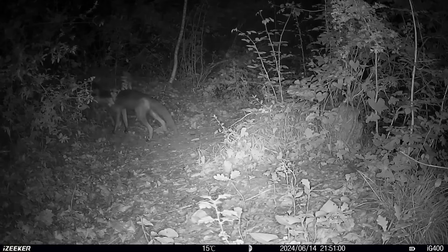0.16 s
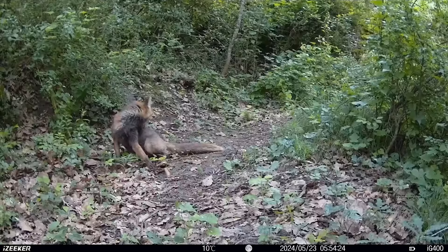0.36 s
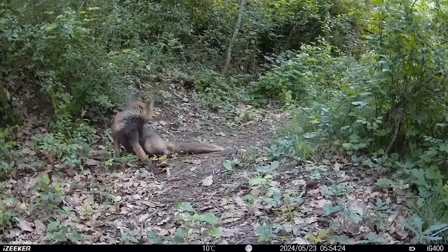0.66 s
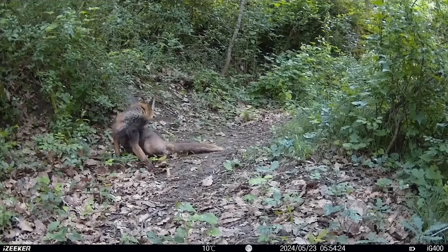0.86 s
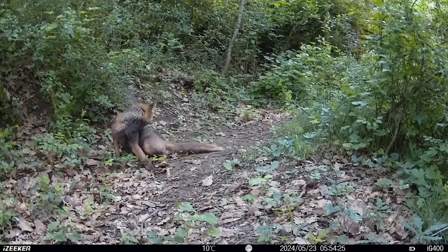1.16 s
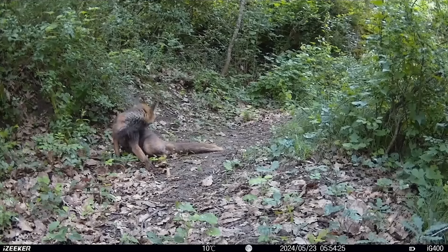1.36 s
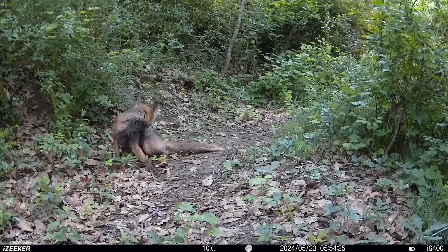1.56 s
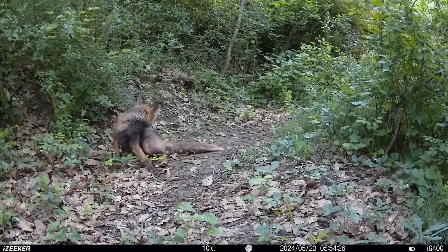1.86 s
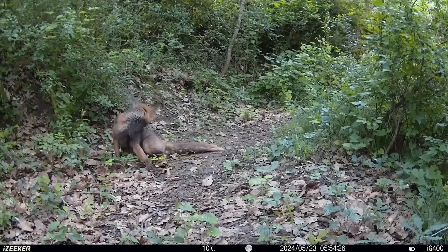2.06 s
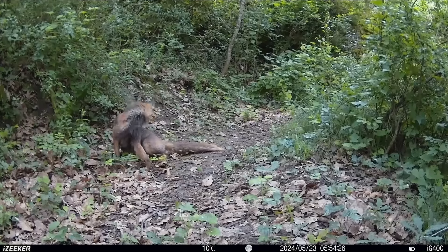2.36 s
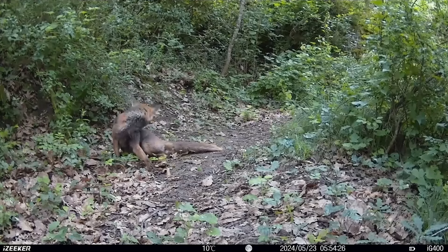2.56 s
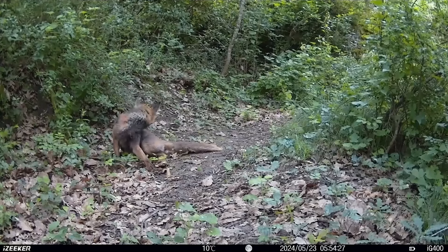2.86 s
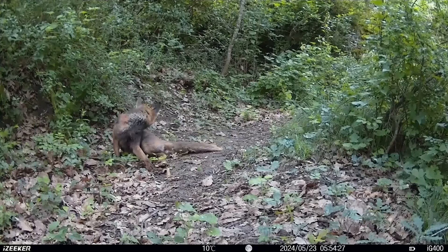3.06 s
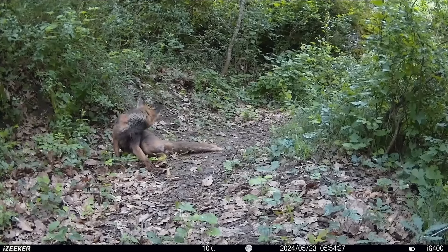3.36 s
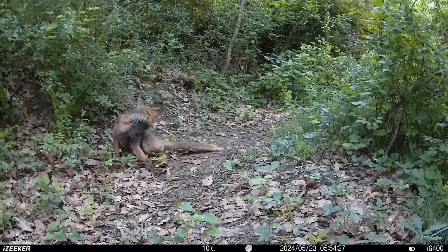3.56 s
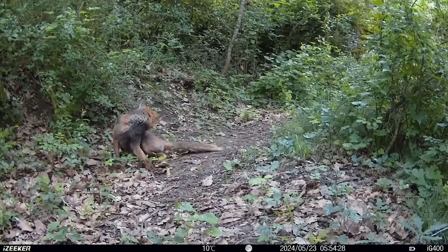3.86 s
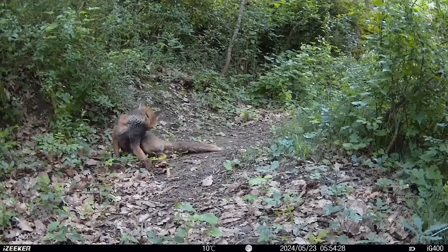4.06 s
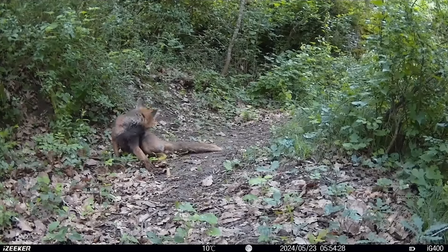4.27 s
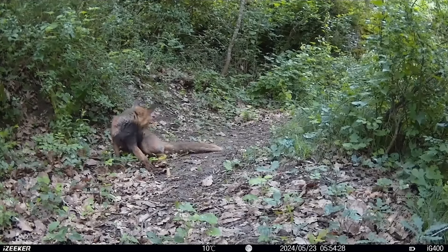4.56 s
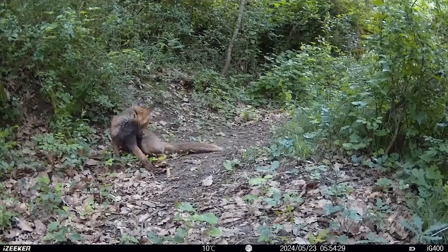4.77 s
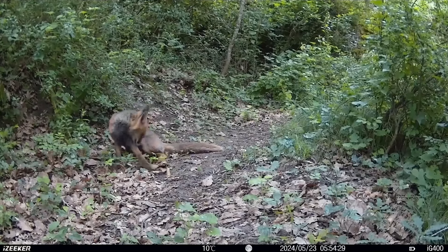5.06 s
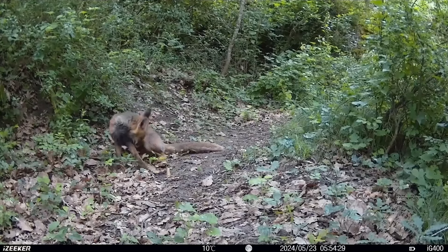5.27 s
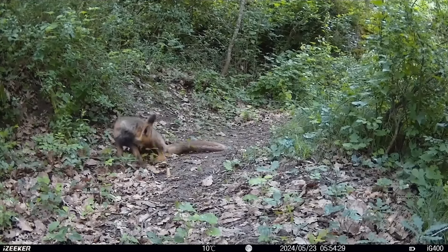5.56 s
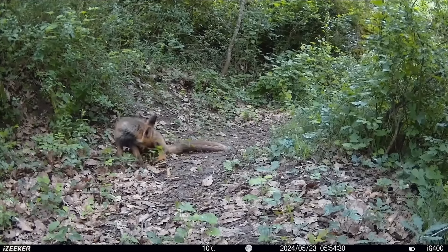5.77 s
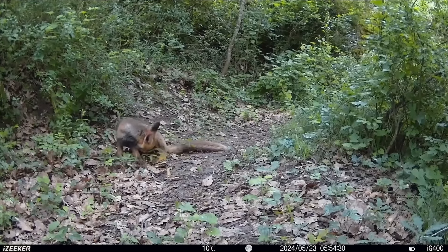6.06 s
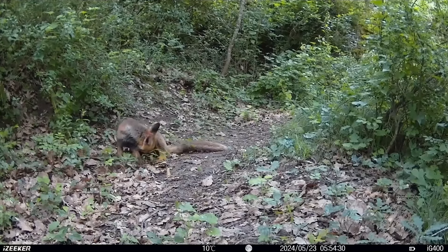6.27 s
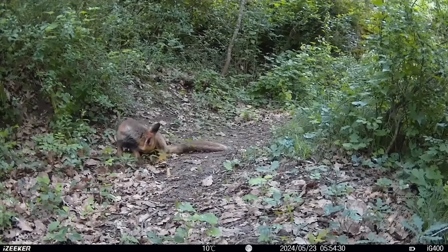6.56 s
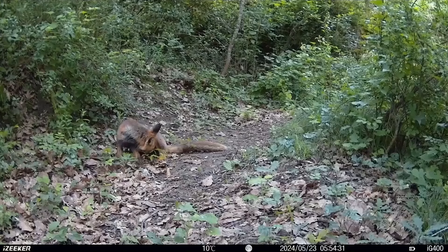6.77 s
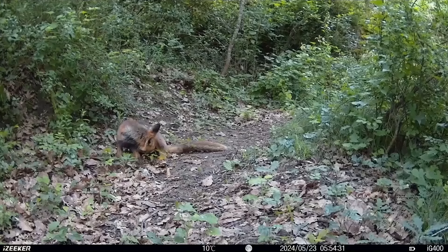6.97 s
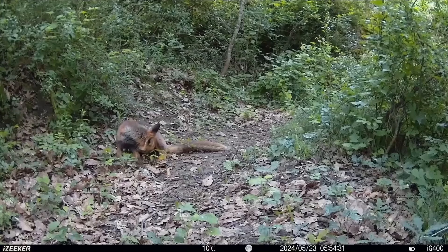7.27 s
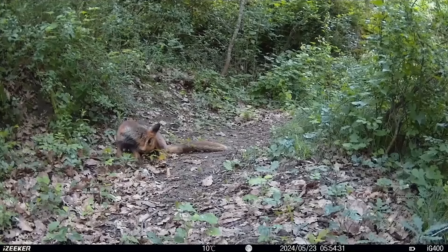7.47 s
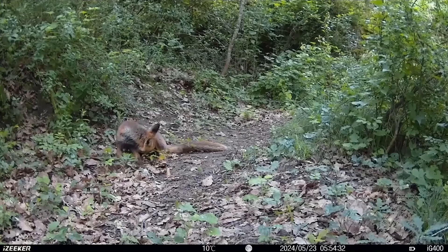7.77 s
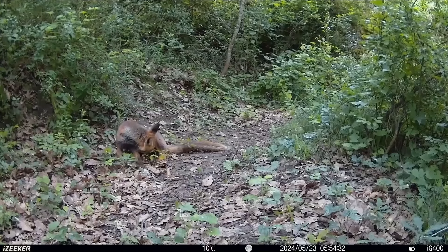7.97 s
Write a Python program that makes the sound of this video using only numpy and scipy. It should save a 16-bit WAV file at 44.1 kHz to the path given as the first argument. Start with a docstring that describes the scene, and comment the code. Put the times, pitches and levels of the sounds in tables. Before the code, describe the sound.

A scrap of quiet night air with a tiny dry leaf crackle cuts to silence, then a very loud distorted pop as the microphone switches on. A woodland dawn chorus follows: short gliding whistles, high chirps and bright quick ticks from a nearer bird, echoing off trunks. A soft distant road rumble and thin microphone hiss continue throughout. The fox grooming itself is not heard.

```python
"""Dawn chorus in a wood, taken by a small outdoor camera over filtered-noise road rumble and microphone hiss.
A scrap of night air with one leaf rustle, a noise burst, ends in a short mute; then the microphone circuit
switches on with an overloading pop of decaying voltages. Birds whistle gliding near-sine notes and nearer
ones tick in very fast pitch sweeps, while the trunks scatter every call through noise tails. A faint patchy
shimmer of short random glides, heard only as echo, lies beneath."""
import sys
import numpy as np
from scipy import signal
from scipy.fft import rfft, irfft, next_fast_len
from scipy.io import wavfile
from scipy.ndimage import uniform_filter1d

SR = 44100
rng = np.random.default_rng(int(sys.argv[2]) if len(sys.argv) > 2 else 0)


def to_wav(s):
    """Save 16-bit WAV."""
    ch = np.atleast_2d(s).T  # columns
    pcm = np.round(np.clip(ch, -1, 1) * 32767)  # PCM
    wavfile.write(sys.argv[1], SR, pcm.astype(np.int16))


def voltage_ratio(decibels):
    """Convert decibels (scalar or array-like) to amplitude ratios, 20 dB per decade."""
    exponent = np.asarray(decibels, float) / 20
    return 10 ** exponent


N = 358533
T = np.arange(N) / SR  # seconds


def unit(x):
    """Scale to rms 1."""
    return x / np.sqrt(np.mean(x ** 2))


def walk(rate):
    """Random levels held 1 / rate s and slewed twice; spread near 1."""
    hold = int(SR / rate)
    steps = np.repeat(rng.standard_normal(N // hold + 1), hold)
    return 1.663 * uniform_filter1d(uniform_filter1d(steps, hold), hold)[:N]


def coloured(points):
    """Noise of rms 1 shaped by a (Hz, dB) spectrum, interpolated over log frequency."""
    hz, db = np.transpose(points)
    size = next_fast_len(N)
    bins = np.arange(size // 2 + 1) * SR / size + 1e-9
    gain = voltage_ratio(np.interp(np.log(bins), np.log(hz), db))
    return unit(irfft(rfft(rng.standard_normal(size)) * gain, size)[:N])


def trunks(x, t60_s, build_s, uneven_db):
    """Scatter off many trunks: a tail of unit energy, uneven from echo to echo, that builds up and dies away."""
    t = np.arange(int(SR * t60_s)) / SR
    uneven = np.repeat(rng.standard_normal(SR // 20), 20)
    echoes = rng.standard_normal(SR) * voltage_ratio(uneven_db * uneven)
    tail = echoes[:len(t)] * (1 - np.exp(-t / build_s)) * np.exp(-np.log(1000) * t / t60_s)
    return signal.fftconvolve(x, tail / np.sqrt(np.sum(tail ** 2)))[:N]


def add(out, start_s, hz, gain):
    """Mix in a sine that follows a pitch track."""
    i = int(start_s * SR)
    tone = gain * np.sin(2 * np.pi * np.cumsum(hz) / SR)
    out[i:i + len(tone)] += tone[:N - i]


# Spectrum of the microphone's own hiss. Each row: frequency in Hz, relative density in dB.
HISS_SPECTRUM = [(710, -10.5), (1200, -13), (1280, -69.5), (1380, -43), (2480, -7.5), (2710, -3.5),
                 (4430, -7.5), (8150, -7), (15500, -14)]
HISS_DB = -54.5


def hiss():
    """Microphone hiss: coloured noise with a nearly steady level."""
    return coloured(HISS_SPECTRUM) * voltage_ratio(HISS_DB + .5 * walk(2.6))


# Spectrum of the distant road at the microphone. Each row: frequency in Hz, relative density in dB.
ROAD_SPECTRUM = [(8.8, -38), (15, -4), (54, -2.5), (112, -7), (145, -12.5), (188, -14), (242, -15.5),
                 (288, -22.5), (635, -26), (1180, -25.5), (2500, -36), (3250, -72), (5500, -120)]
# Slow swell of the road. Each row: time in seconds, bass gain in dB, tyre-band gain in dB.
ROAD_SWELL = [(0, -1.5, -1.5), (.2, 1, -0.6), (1.6, 0, -1), (3, 1, 0), (5.2, 0, 1.5), (6.8, -0.5, 0.55),
              (8.13, .5, 1)]
ROAD_DB, ROAD_SPLIT_HZ = -41.5, 220  # level before the swell; border of bass and tyre band


def road_rumble():
    """Distant road: coloured noise whose bass and tyre band swell slowly and separately."""
    s, bass_db, tyre_db = np.transpose(ROAD_SWELL)
    road = coloured(ROAD_SPECTRUM) * voltage_ratio(ROAD_DB + 0.56 * walk(2.994))
    bass = signal.sosfiltfilt(signal.butter(2, ROAD_SPLIT_HZ, fs=SR, output="sos"), road)
    tyres = road - bass
    return bass * voltage_ratio(np.interp(T, s, bass_db)) + tyres * voltage_ratio(np.interp(T, s, tyre_db))


# Bands of the leaf rustle. Each row: centre in Hz, width in Hz, rms level at the burst's peak in dB.
RUSTLE_BANDS = [(1945, 590, -45), (6200, 850, -45), (7650, 1040, -44.5), (10100, 2500, -50)]
RUSTLE_S, RUSTLE_FADE_S = 0.14, 0.0127  # time of the peak; time constant on either side


def rustle():
    """One brief crackle of dry leaves: band-passed noise of fast uneven level."""
    half = SR // 2
    noise = rng.standard_normal(half) * voltage_ratio(4.2 * walk(600)[:half])
    bands = np.zeros(half)
    for hz, width, db in RUSTLE_BANDS:
        band = signal.butter(2, [hz - width / 2, hz + width / 2], "band", fs=SR, output="sos")
        bands += voltage_ratio(db) * unit(signal.sosfilt(band, noise))
    burst = bands * np.exp(-np.abs(T[:half] - RUSTLE_S) / RUSTLE_FADE_S)
    return np.pad(burst, (0, N - half))


def sing(notes, edge=0.04, waver=0.006, warble=.014, rasp=0.021, flutter_db=6):
    """Near-sine notes on bent pitch lines; high voices warble fast, far ones rasp and flutter.

    Returns the direct sound and the sound thrown at the trunks."""
    direct, thrown = np.zeros(N), np.zeros(N)
    slow, fast, gusts = walk(120), walk(500), walk(90)
    for start, length, first_hz, mid_hz, last_hz, db, far in notes:
        far = np.clip(far, 0, 1)
        u = np.linspace(0, 1, int(length * SR))
        # a parabola through the three pitches
        hz = 2 * first_hz * (u - .5) * (u - 1) - 4 * mid_hz * u * (u - 1) + 2 * last_hz * u * (u - .5)
        span = (int(start * SR) + np.arange(len(u))) % N
        small_bird = mid_hz > 4400
        hz = hz * (1 + waver * slow[span] + (warble if small_bird else rasp * far) * fast[span])
        size = np.sqrt(2) * voltage_ratio(db) * np.clip(np.minimum(u, 1 - u) / edge, 0, 1)
        # distance moves energy from the straight path, which moving air makes unsteady, to the echo
        add(direct, start, hz, size * np.sqrt(1 - far) * voltage_ratio(flutter_db * far * gusts[span]))
        add(thrown, start, hz, size * np.sqrt(far))
    return direct, thrown


SHIMMER_GLIDES_PER_S = 50


def faint_shimmer():
    """Faint patchy shimmer: short random glides heard only as echo."""
    chance = rng.random((int(SHIMMER_GLIDES_PER_S * N / SR), 5)).T
    start_s = .2 + (T[-1] - .4) * chance[0]
    hz = 2200 + 6800 * chance[1]
    length_s = 0.025 + .05 * chance[2]
    glide = 1 + 0.1697 * (chance[3] - .5)
    db = -73 + 5 * chance[4]
    notes = np.transpose([start_s, length_s, hz / glide, hz, hz * glide, db, np.ones_like(hz)])
    return trunks(sing(notes)[1], 0.23, 0.013, 2.1)


# Whistled notes from the birds one can follow.
# Each row: start in seconds, length in seconds, start pitch in Hz, end pitch in Hz, level in dB.
WHISTLED_NOTES = [(0.212, .03, 3120, 3100, -56.5), (.24, 0.051, 2965, 2973, -49.5),
                  (.27, .042, 7040, 6800, -51), (0.288, 0.08, 3290, 3410, -52.5),
                  (0.313, 0.027, 6520, 5730, -54.5), (.47, .05, 4690, 4570, -59),
                  (0.488, .015, 2310, 2300, -55.5), (0.491, .165, 4010, 3860, -56.5),
                  (.62, .092, 3510, 3535, -56), (0.773, .085, 3390, 3300, -53.5),
                  (.81, 0.049, 3020, 2660, -57.5), (.91, .11, 2590, 2480, -59),
                  (0.992, 0.069, 8160, 7340, -55), (1.082, 0.032, 3700, 3870, -49),
                  (1.115, .017, 2710, 2870, -54.5), (1.334, 0.051, 2736, 2750, -55),
                  (1.53, .05, 2230, 2360, -55.5), (1.79, .055, 3240, 3940, -55.5),
                  (1.899, 0.028, 2794, 2660, -48), (2.067, 0.022, 2656, 2786, -49),
                  (2.1, 0.15, 7420, 6720, -58.5), (2.112, .07, 8330, 8100, -58),
                  (2.189, .096, 6950, 5630, -56), (2.2, .135, 6720, 6690, -61),
                  (2.29, .14, 7930, 7820, -57.5), (2.698, .066, 3260, 2100, -49.5),
                  (2.885, .067, 2600, 2866, -50.5), (2.977, .04, 2290, 2160, -56.5),
                  (3.092, .058, 3600, 3560, -58), (3.096, 0.12, 7330, 7130, -56.5),
                  (3.137, .029, 6750, 6830, -52), (3.152, .094, 2970, 3197, -56.5),
                  (3.216, 0.028, 5170, 4950, -55), (3.245, 0.14, 3363, 3300, -53.5),
                  (3.31, .027, 2060, 2590, -52.5), (3.572, 0.041, 6270, 6440, -57),
                  (3.662, 0.028, 4510, 4400, -58), (3.681, 0.18, 3270, 3290, -56.5),
                  (3.77, 0.051, 3980, 4130, -58), (3.867, .063, 2250, 2710, -52.5),
                  (3.978, 0.07, 4400, 4240, -59.5), (4.095, 0.053, 3630, 2750, -50),
                  (4.131, .075, 5400, 4840, -57), (4.153, 0.05, 2716, 3150, -52),
                  (4.292, 0.053, 3800, 3590, -57.5), (4.4, .066, 2720, 2620, -59),
                  (4.35, .061, 6830, 6460, -57), (4.446, .106, 8300, 7150, -55),
                  (4.46, .09, 6450, 6780, -60), (4.583, .057, 3980, 3540, -59),
                  (4.828, .114, 3630, 3410, -56), (4.876, .039, 8580, 8700, -58),
                  (4.97, .081, 8560, 7870, -56), (4.997, .17, 3063, 3070, -54.5),
                  (5.142, 0.071, 2890, 2540, -55.5), (5.15, .07, 8110, 7500, -56.5),
                  (5.273, .106, 3710, 3460, -56.5), (5.39, 0.037, 3270, 3140, -50),
                  (5.396, 0.07, 7820, 7260, -54), (5.418, 0.069, 7030, 6850, -57),
                  (5.496, .047, 7380, 5400, -50.5), (5.554, 0.11, 5430, 5470, -56.5),
                  (5.59, .08, 4960, 5000, -64), (5.677, 0.097, 3680, 2920, -49),
                  (5.78, .044, 5230, 4400, -53), (5.871, .039, 5220, 4390, -51.5),
                  (5.917, .08, 2430, 2430, -60), (5.997, .049, 3180, 2760, -53),
                  (6.037, 0.061, 3040, 3040, -60), (6.111, 0.105, 2590, 2830, -54),
                  (6.107, 0.17, 5510, 6090, -60.5), (6.157, 0.041, 8200, 8680, -59),
                  (6.197, 0.035, 8270, 7650, -52.5), (6.25, 0.21, 1580, 1600, -58.5),
                  (6.27, 0.0503, 3006, 3200, -51), (6.309, .114, 3274, 3290, -52),
                  (6.454, .066, 8320, 7740, -52.5), (6.501, .075, 2850, 3250, -53.5),
                  (6.5, .078, 8360, 8280, -51.5), (6.532, .049, 7080, 7270, -54),
                  (6.56, .088, 3000, 2690, -54), (6.702, .092, 2700, 2290, -55),
                  (6.734, 0.036, 3140, 2870, -60), (7.024, .06, 8590, 8200, -58),
                  (7.029, 0.068, 2840, 3010, -56.5), (7.138, .13, 3350, 4710, -58.5),
                  (7.476, .065, 8330, 7800, -55.5), (7.534, .056, 2340, 2760, -51),
                  (7.562, .027, 2950, 2400, -61), (7.598, 0.073, 2280, 2205, -58),
                  (7.888, 0.064, 2160, 2170, -54.5), (8.07, .056, 6600, 8200, -61)]
# Thin high hooks that dive and spring back. Each row: start in seconds, middle pitch in Hz, level in dB.
HIGH_HOOKS = [(1.935, 8160, -45.5), (6.275, 8720, -51)]
HOOK_S, HOOK_DIVE, HOOK_RETURN = .04, 1.13, 1.07  # length; start and end pitch over the middle one
# Deep voices sing close by, small high ones from the canopy.
# Each row: pitch in Hz, share of the energy that reaches the microphone as echo from 0 to 1.
PITCH_DISTANCE = [(1600, .05), (2300, 0.32), (2800, 0.53), (4000, 0.64), (5000, 0.75), (8000, 0.78)]
GLIDE_MIDWAY = .52  # share of a glide done at half length


def whistles():
    """The birds near enough to follow; glides share one bend, and pitch tells the distance."""
    notes = []
    for start, length, first_hz, last_hz, db in WHISTLED_NOTES:
        mid_hz = first_hz + GLIDE_MIDWAY * (last_hz - first_hz)
        notes.append((start, length, first_hz, mid_hz, last_hz, db))
    for start, hz, db in HIGH_HOOKS:
        notes.append((start, HOOK_S, HOOK_DIVE * hz, hz, HOOK_RETURN * hz, db))
    hz, share = np.transpose(PITCH_DISTANCE)
    direct, thrown = sing([(*note, np.interp(note[3], hz, share)) for note in notes])
    return direct + trunks(thrown, 0.62, 0.0063, 4.2)


# Echo levels in the four tables below are before the lift of ECHO_LIFT_DB; ticks begin 1 ms before their time.
# A farther, higher bird's ticks. Each row: time in seconds, direct level in dB, echo level in dB.
FAR_BIRD_TICKS = [(.665, -56, -49.5), (0.856, -51, -56), (1.925, -45.5, -59), (3.424, -57, -52),
                  (5.3, -47.5, -66), (6.305, -48, -56), (6.627, -47.5, -53), (6.739, -47, -58.5),
                  (6.844, -70, -54.5), (7.016, -57, -53), (7.245, -51.5, -54), (7.373, -52, -52),
                  (7.597, -52, -48.5)]
FAR_TICK_LOW_HZ, FAR_TICK_HIGH_HZ = 5610, 8790
# Falling chips, ticks in reverse.
# Each row: time in seconds, start pitch in Hz, end pitch in Hz, direct level in dB, echo level in dB.
FALLING_CHIPS = [(3.204, 7300, 4750, -43, -51.5)]
# The near bird's ticks. Each row: time in seconds, direct level in dB, echo level in dB.
NEAR_BIRD_TICKS = [(1.0164, -34, -41), (1.0852, -38, -52.5), (1.1487, -34, -47), (1.2145, -33, -47.5),
                   (1.352, -28, -40.5), (1.4564, -38, -47), (4.5571, -39.5, -49), (4.6832, -41, -51),
                   (4.758, -33.5, -47.5), (4.821, -39, -52), (4.8892, -35.5, -46), (4.963, -39.5, -49),
                   (5.089, -35.5, -44)]
# The near bird's sweep rises with effort. Each row: echo level in dB, bottom in Hz, top in Hz.
EFFORT_RANGE = [(-53, 3400, 6900), (-46.5, 3540, 8040), (-39.5, 4240, 8400)]


def tick_rows():
    """All ticks as (s, start Hz, end Hz, direct dB, echo dB); effort sets the near bird's pitches."""
    effort_db, low_hz, high_hz = np.transpose(EFFORT_RANGE)
    near = [(s, np.interp(echo, effort_db, low_hz), np.interp(echo, effort_db, high_hz), direct, echo)
            for s, direct, echo in NEAR_BIRD_TICKS]
    far = [(s, FAR_TICK_LOW_HZ, FAR_TICK_HIGH_HZ, direct, echo) for s, direct, echo in FAR_BIRD_TICKS]
    return near + FALLING_CHIPS + far


TICK_S, GROUND_S = 0.00765, 0.0012545  # tick length; usual delay of the ground path
NEAR_BUILD_S, FAR_BUILD_S = 0.0019, .012  # echo build-up of near and far ticks
CLEAR_DB, ECHO_LIFT_DB = 8, 15  # direct over echo level at which a tick counts as near; lift of every echo


def ticks(bend=1.5, ground=.5, turn=.2):
    """Each tick sweeps fast and slows near its end; its echo, new with each turn of the head, is a bright puff."""
    out = np.zeros(N + SR)
    u = np.linspace(0, 1, int(TICK_S * SR))
    for start, first_hz, last_hz, direct_db, echo_db in tick_rows():
        sweep = np.zeros(len(u))
        hz = last_hz - (last_hz - first_hz) * (1 - u) ** bend
        add(sweep, 0, hz, np.sin(np.pi * u ** 0.42) ** 1.42)
        near = min(voltage_ratio(direct_db - echo_db - CLEAR_DB), 1)
        build_s = NEAR_BUILD_S if near == 1 else FAR_BUILD_S
        heard = voltage_ratio(echo_db + ECHO_LIFT_DB) * trunks(sweep, 0.39, build_s, 3.8)
        heard[:len(u)] += voltage_ratio(direct_db) * sweep
        # a second path off the ground combs the puff into bands, less so from far off
        delay = int(GROUND_S * SR * (1 + turn * rng.standard_normal()))
        heard = heard + ground * near * np.roll(heard, delay)
        i = int((start - .001) * SR)
        out[i:i + len(heard)] += heard
    return out[:N]


def scene():
    """Birds, shimmer, leaves, road and hiss at one microphone."""
    return (whistles() + faint_shimmer() + ticks() + rustle() + road_rumble() + hiss())[None]


MUTE_S, ON_S = .161, .20243  # the mute begins; the microphone circuit switches on


def thin_treble(x, start_hz=1800, full_hz=9000, under_db=3.5, busy=.25, left_db=-20, after_pop_db=1.8,
                recover_s=.8):
    """The treble flickers: its faintest bins are turned down, more while birds are loud and after the pop."""
    hz, s, bins = signal.stft(x, SR, nperseg=2048)
    power = np.abs(bins) ** 2 + 1e-18
    local = np.exp(uniform_filter1d(np.log(power), size=40, axis=0))
    # a limit on the local level keeps loud calls whole
    local = np.minimum(local, 2 * np.median(local, axis=1, keepdims=True))
    birds_db = 10 * np.log10(uniform_filter1d(power[hz > start_hz].mean(axis=0), size=5))
    busy_db = busy * (birds_db - np.median(birds_db))
    pop_db = after_pop_db * np.exp(-(s - ON_S) / recover_s) * (s > ON_S)
    low_relief_db = 5 * np.clip((full_hz - hz) / (full_hz - start_hz), 0, 1)[:, None]
    reach_db = under_db + busy_db + pop_db - low_relief_db
    faint = (power < local * voltage_ratio(2 * np.minimum(reach_db, 6))) & (hz > start_hz)[:, None]
    return signal.istft(np.where(faint, voltage_ratio(left_db), 1) * bins, SR, nperseg=2048)[1][:N]


# Switch-on voltages of coupling stages that settle against each other.
# Each row: size relative to full scale, time constant in seconds.
POP_STAGES = [(3.165, .031), (-1.39, .0891), (-.622, .00836)]


def switch_on_pop():
    """Voltage steps of both signs at switch-on, each decaying exponentially."""
    since_on = np.maximum(T - ON_S, 0)
    return sum(size * np.exp(-since_on / tau) for size, tau in POP_STAGES) * (T >= ON_S)


def roll_off(x):
    """The treble ends steeply here."""
    return signal.sosfilt(signal.butter(12, 16870, fs=SR, output="sos"), x)


TOP_HZ = 15900


def record(dry):
    """Muted for a moment, then the switch-on pop rides under the sound and clips at full scale; the top is cut."""
    unmuted = (T < MUTE_S) | (T >= ON_S)
    live = thin_treble(dry[0])[None] * unmuted
    live = np.clip(live + switch_on_pop(), -1, 1)
    live = signal.sosfiltfilt(signal.cheby2(16, 25, TOP_HZ, fs=SR, output="sos"), live)
    finished = np.clip(live, -1, 1)
    return roll_off(finished)


dry = scene()
out = record(dry)
to_wav(out)
```